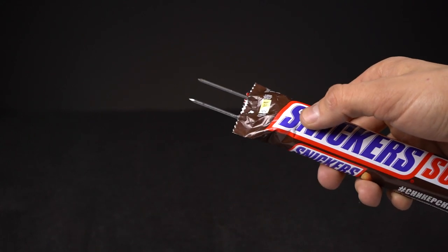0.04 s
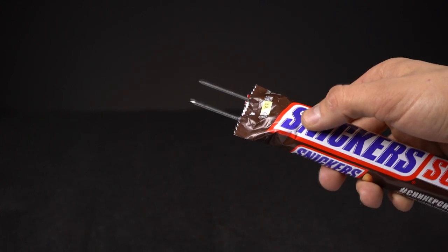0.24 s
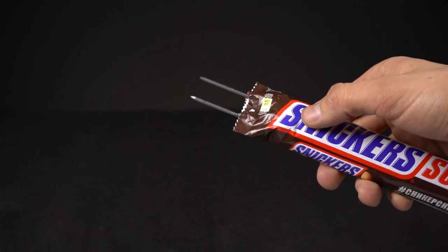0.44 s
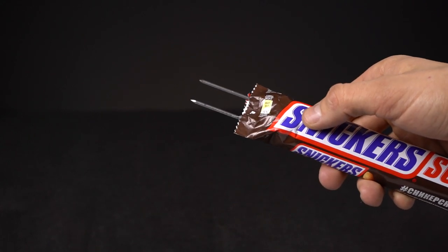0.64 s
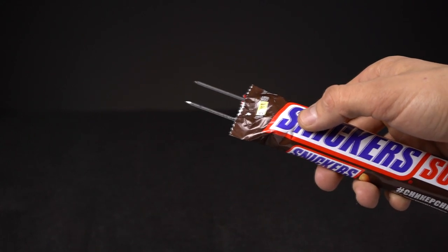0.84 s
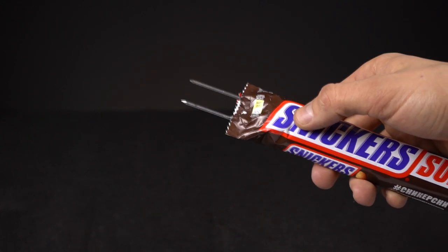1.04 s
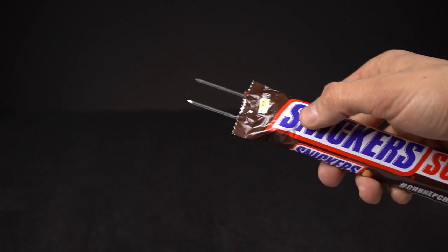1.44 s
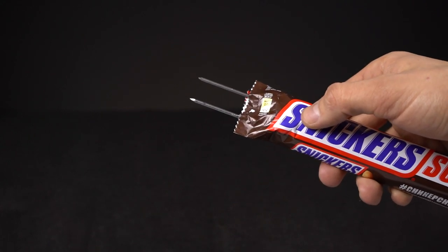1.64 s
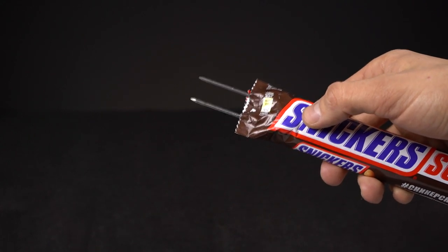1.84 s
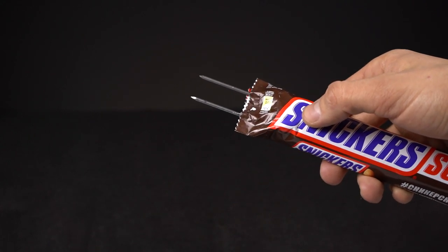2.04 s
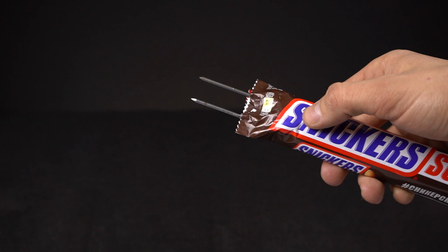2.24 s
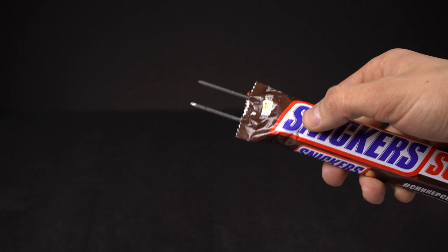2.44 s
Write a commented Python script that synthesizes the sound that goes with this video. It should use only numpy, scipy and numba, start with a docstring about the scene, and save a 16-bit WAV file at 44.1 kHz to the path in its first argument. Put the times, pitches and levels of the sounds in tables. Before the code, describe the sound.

An electric spark snaps twice in a small room, amid faint clicks and fan hum.

```python
"""Two sparks crack between the prongs of a small hand-held high-voltage device in a live little room.
Each is one pressure spike, trailed by tight echoes and a bright room ring. The plastic push button
snaps against its stop and the case ticks under the thumb, over a steady bed of fan and mains hum.
Each spark pushes a fast compressor down, so the hum ducks and the room's ring is drawn out."""
import sys
import numpy as np
from scipy import signal
from scipy.fft import rfft, irfft, next_fast_len
from scipy.io import wavfile
from scipy.ndimage import uniform_filter1d, map_coordinates
from numba import njit

SR = 44100
rng = np.random.default_rng(int(sys.argv[2]) if len(sys.argv) > 2 else 0)


def persist_wave(psi):
    """Save psi, clipped to +-1, as 16-bit WAV."""
    counts = np.round(np.clip(psi, -1, 1) * 32767).astype(np.int16)
    wavfile.write(sys.argv[1], SR, np.atleast_2d(counts).T)


N = 114660

# tone of the fan's air rush: freq_hz, gain_db
AIR_EQ = [(25, -38), (45, -27), (70, -15), (100, -10), (125, -7), (190, -4), (260, -6), (340, -3),
          (470, -5), (580, -11), (900, -10), (1400, -16), (2000, -21), (3000, -27), (5000, -32.5),
          (9000, -36), (16000, -37.5)]
# stereo image of the rush (1 is mono, 0 is wide): freq_hz, correlation
AIR_CORRELATION = [(30, 0.96), (100, 1), (350, 0.96), (700, 0.68), (1500, 0.46), (4000, 0.17),
                   (15000, 0.13)]
# fan and mains hum tones: pitch_hz, level_db, width_hz
HUM_TONES = [(100, -57.5, 1.5), (153, -59.5, 10), (212, -58, 9), (289, -55.5, 14), (349.5, -52.5, 4),
             (381.5, -54, 3), (415, -58.5, 10), (479, -55.5, 9), (762.5, -61.5, 5)]
# slow swell of the bed's low end: time_s, gain_db
LOW_SWELL = [(0, 1), (.2, 1.5), (.6, -2), (.9, -0.5), (1.15, 2), (1.4, -0.5), (1.75, -1.5), (2.3, 0.8),
             (2.6, 1.5)]
# faint ticks of the case: start_s, level_db
CASE_TICKS = [(0.118, -48.5), (1.1836, -51.5), (2.126, -52.5), (2.144, -53.5), (2.516, -48), (2.52, -57)]
# tone of a tick: freq_hz, gain_db
TICK_EQ = [(300, 4), (1500, 18), (4000, 1.5), (7000, 6), (10000, 3), (15000, -19)]
# decay of the room: freq_hz, t60_s
ROOM_DECAY = [(300, 0.22), (1500, 0.3), (4000, 0.25), (8000, 0.19), (15000, 0.15)]
# spark hits: start_s, level_db
SPARK_HITS = [(0.22645, 15.5), (1.47055, 14.5)]
# slaps off near surfaces: delay_s, left_db, right_db
NEAR_ECHOES = [(.00093, -14, -7), (.00227, -2, -12), (.0032, -7, -18), (.0046, -14, -20), (.0077, -11, -8),
               (.0097, -10, -10), (.0107, -8, -8)]
# tone of a spark's crack: freq_hz, gain_db
CRACK_EQ = [(200, -12), (700, -12), (1500, -8), (4000, -3), (8500, 2.5), (12000, 2.5), (16000, -3)]
# tone of its ring in the room: freq_hz, gain_db
RING_EQ = [(200, -41), (700, -16.5), (1500, -10), (3000, -8), (5000, -4.5), (8000, 2), (11000, 0.5),
           (16000, -1.5)]
# balance of that ring: freq_hz, left_over_right_db
RING_BALANCE = [(1000, -0.5), (4400, 1), (8100, -1), (14000, 2)]
# button clicks: start_s, snap_db, travel_s, stop_db, knock_db
BUTTON_CLICKS = [(1.0425, -24.5, 0.00311, -21, -22.5), (1.4489, -22, .0022, -33, -40),
                 (1.959, -24, .0028, -26.5, -28), (2.33, -25.5, .0025, -26.5, -29)]
# resonances the case rings with at each contact: pitch_hz, level_db, t60_s
CONTACT_RING_MODES = [(1598, -17, 0.017), (2130, -20, 0.029), (2420, -12, .01), (3270, -26, 0.01),
                      (5380, -16.5, 0.0073), (6600, -22, 0.013), (7480, -23.5, .006), (8940, -15.5, 0.0025)]
# tone of a contact's noise burst: freq_hz, gain_db
BURST_EQ = [(300, -12), (2000, 1.5), (6000, -1), (11000, -9), (15000, -8)]
# resonances of the knocked case: pitch_hz, level_db, t60_s
CASE_MODES = [(1280, -10, 0.01), (1454, -4.5, .011)]


def amp(db):
    """Decibels to gain."""
    return 10 ** (np.asarray(db) / 20)


def unit(x):
    """Scale to rms 1."""
    return x / np.sqrt(np.mean(x ** 2) + 1e-20)


def along(points, hz):
    """Read (Hz, value) points on a log axis."""
    f, v = np.transpose(points)
    return np.interp(np.log(hz + 1), np.log(f + 1), v)


def fade(t, t60):
    """Exponential decay."""
    return np.exp(-np.log(1000) * t / t60)


def filtered(x, response):
    """x times a complex response of frequency."""
    n = x.shape[-1]
    m = next_fast_len(n + SR // 4)
    return irfft(rfft(x, m) * response(np.fft.rfftfreq(m, 1 / SR)), m)[..., :n]


def coloured(x, points):
    """Causal filter with the given (Hz, dB) shape."""
    size = 2048
    cep = irfft(np.log(amp(along(points, np.fft.rfftfreq(size, 1 / SR)))))
    cep[1:size // 2] *= 2
    cep[size // 2 + 1:] = 0
    return signal.fftconvolve(x, irfft(np.exp(rfft(cep)))[None], axes=1)


def add(track, s, sound):
    """Mix a sound in at time s."""
    part = track[:, round(s * SR):][:, :sound.shape[-1]]
    part += sound[..., :part.shape[1]]


def fan_and_mains(air_db=-46, waver_db=2.5, swell_below_hz=870):
    """A bed of rushing air and wavering hum; the low end swells slowly while the hiss holds steady."""
    def air_spread(hz):
        """Mid and side gains: the less alike the channels, the more side."""
        angle = np.arccos(np.clip(along(AIR_CORRELATION, hz), -1, 1)) / 2
        return amp(along(AIR_EQ, hz)) * [np.cos(angle), np.sin(angle)]

    t = np.arange(N) / SR
    mid, side = filtered(rng.standard_normal((2, N)), air_spread)
    bed = amp(air_db) * unit(np.array([mid + side, mid - side]))
    for hz, db, width_hz in HUM_TONES:
        knots = rng.standard_normal((2, 256))  # smoothed into pitch drift and level waver
        drift, waver = (map_coordinates(row, [t * width_hz * 2], mode="mirror") for row in knots)
        phase = 2 * np.pi * np.cumsum(hz + drift * width_hz / 2) / SR
        bed += np.sqrt(2) * amp(db + waver_db * waver) * np.sin(phase)
    low_end = filtered(bed, lambda hz: 1 / (1 + (hz / swell_below_hz) ** 2))
    swell = amp(np.interp(t, *np.transpose(LOW_SWELL)))
    return bed + low_end * (swell - 1)


def case_ticks(t60_s=0.033):
    """Light touches of the thumb draw short, noisy ticks from the case."""
    out, t = np.zeros((1, N)), np.arange(SR // 10) / SR
    for start_s, db in CASE_TICKS:
        burst = rng.standard_normal((1, len(t))) * fade(t, t60_s)
        add(out, start_s, amp(db) * coloured(burst, TICK_EQ))
    return out


def room_tail(predelay_s=0.0024, build_s=0.012):
    """A fresh stereo reverb tail of unit energy a side: it blooms, then the top dies first."""
    hz, t, spectrum = signal.stft(rng.standard_normal((2, SR // 2)), SR, nperseg=256)
    tail = signal.istft(spectrum * fade(t, along(ROOM_DECAY, hz)[:, None]), SR, nperseg=256)[1]
    age_s = np.maximum(np.arange(tail.shape[1]) / SR - predelay_s, 0)
    tail *= 1 - np.exp(-age_s / build_s)
    return tail / np.linalg.norm(tail, axis=1, keepdims=True)


def handling_in_room(handling, pan_db=-1, wet_db=-3.5, damping_t60_s=0.16):
    """Handling noise sits just right of centre, with a damped room tail behind it."""
    tail = room_tail()
    tail *= fade(np.arange(tail.shape[1]) / SR, damping_t60_s)
    wet = signal.fftconvolve(handling, tail / np.linalg.norm(tail[0]), axes=1)[:, :N]
    return handling * amp([[pan_db], [-pan_db]]) + amp(wet_db) * wet


def sparks(right_db=-1, scatter_db=-7, scatter_t60_s=0.016, wall_db=-8, wall_echoes_per_s=900,
           wet_db=9.5, crossfeed=0.06):
    """Each spark is one pressure spike, then near echoes, sparse wall echoes and the room's ring."""
    out, t = np.zeros((2, N)), np.arange(SR // 10) / SR
    last_near_s, treble_t60_s = NEAR_ECHOES[-1][0], ROOM_DECAY[-1][1]
    for start_s, db in SPARK_HITS:
        scatter = rng.standard_normal((2, len(t))) * fade(t, scatter_t60_s)
        crack = amp(scatter_db) * scatter / np.linalg.norm(scatter[0])
        crack[:, 0] += amp([0, right_db])  # the direct spike
        for delay_s, *stereo_db in NEAR_ECHOES:
            crack[:, round(delay_s * SR)] += amp(stereo_db)
        wall_hits = (rng.random(len(t)) < wall_echoes_per_s / SR) & (t > last_near_s)
        crack += amp(wall_db) * wall_hits * rng.random((2, len(t))) * fade(t, treble_t60_s)
        tail = room_tail()
        ring = tail + crossfeed * tail[::-1]
        ring = filtered(ring, lambda hz: amp(np.outer([.5, -.5], along(RING_BALANCE, hz))))
        add(out, start_s, amp(db) * coloured(crack, CRACK_EQ))
        add(out, start_s, amp(db + wet_db) * coloured(ring, RING_EQ))
    return out


def plastic_contact(t, burst_db=-8, burst_t60_s=0.0058):
    """Plastic hits plastic: a noise transient and the case's ring, a little different each time."""
    ring = sum(amp(db + rng.normal(0, 2)) * fade(t, t60_s) * np.sin(2 * np.pi * hz * t)
               for hz, db, t60_s in CONTACT_RING_MODES)
    burst = fade(t, burst_t60_s) * rng.standard_normal((1, len(t)))
    return ring + amp(burst_db) * coloured(burst, BURST_EQ)[:, :len(t)]


def button_clicks():
    """The button snaps over, then hits its end stop and knocks the case."""
    out, t = np.zeros((1, N)), np.arange(SR // 10) / SR
    knock = -sum(amp(db) * fade(t, t60_s) * np.sin(2 * np.pi * hz * t) for hz, db, t60_s in CASE_MODES)
    for start_s, snap_db, travel_s, stop_db, knock_db in BUTTON_CLICKS:
        add(out, start_s, amp(snap_db) * plastic_contact(t))
        add(out, start_s + travel_s, amp(stop_db) * plastic_contact(t) + amp(knock_db) * knock)
    return out


@njit
def follow(x, rise, fall):
    """Follow x quickly upward and slowly downward."""
    out, level = np.zeros(len(x)), 0.
    for i in range(len(x)):
        level += (x[i] - level) * (rise if x[i] > level else fall)
        out[i] = level
    return out


def scene():
    """Sparks up front, clicks and ticks behind them, the hum bed underneath."""
    return sparks() + handling_in_room(button_clicks() + case_ticks()) + fan_and_mains()


def record(dry):
    """A fast compressor ducks the mix under each spark, into a soft clipper and a steep high cut."""
    threshold_db, slope, detect_s, attack_s, release_s = -22, 0.97, 0.002, 0.0015, 0.028
    ceiling_db, high_cut_hz = -3, 15850
    power = np.abs(uniform_filter1d(np.mean(dry ** 2, axis=0), round(detect_s * SR)))  # looks ahead
    over_db = np.maximum(10 * np.log10(power + 1e-12) - threshold_db, 0)
    duck_db = follow(slope * over_db, 1 / (1 + attack_s * SR), 1 / (1 + release_s * SR))
    clipped = amp(ceiling_db) * np.tanh(dry * amp(-duck_db - ceiling_db))
    return filtered(clipped, lambda hz: 1 / np.sqrt(1 + (hz / high_cut_hz) ** 160))


dry = scene()
out = record(dry)
persist_wave(out)
```